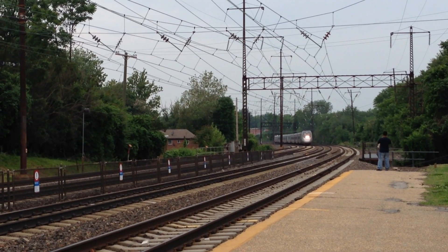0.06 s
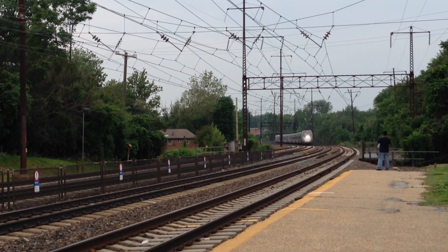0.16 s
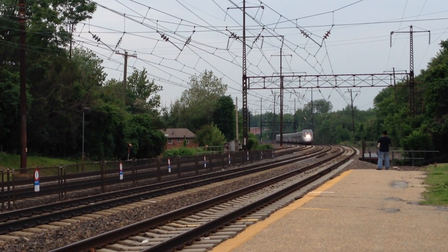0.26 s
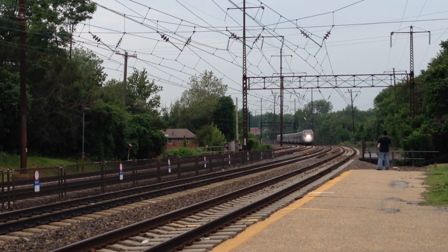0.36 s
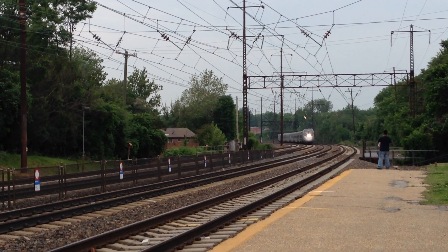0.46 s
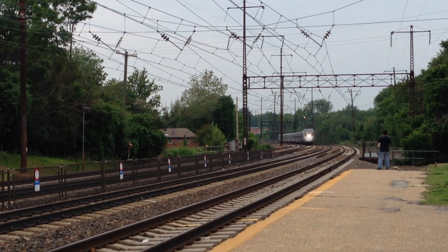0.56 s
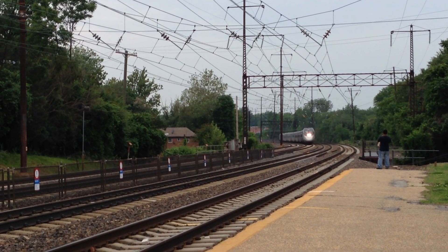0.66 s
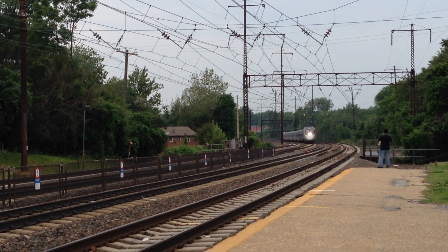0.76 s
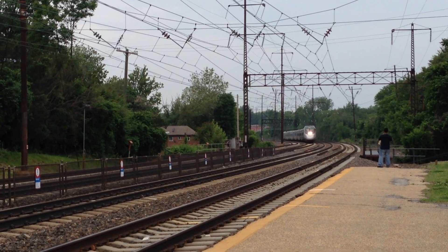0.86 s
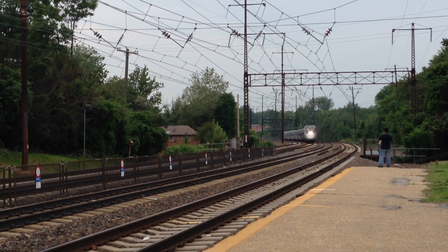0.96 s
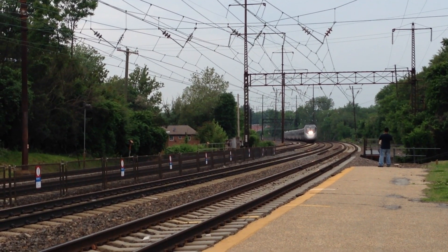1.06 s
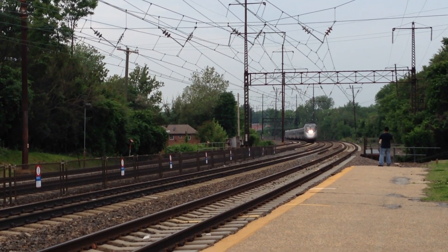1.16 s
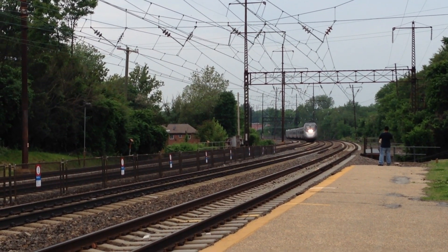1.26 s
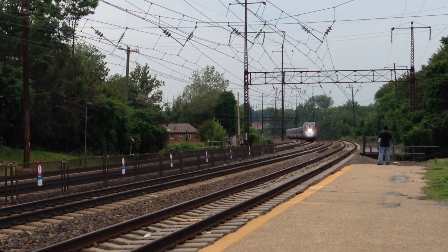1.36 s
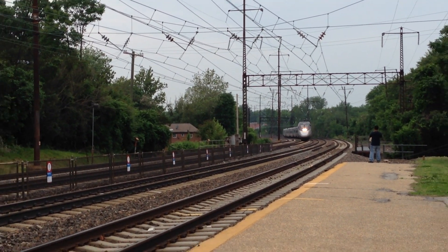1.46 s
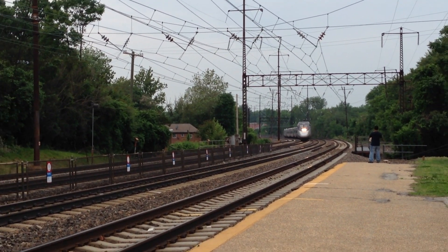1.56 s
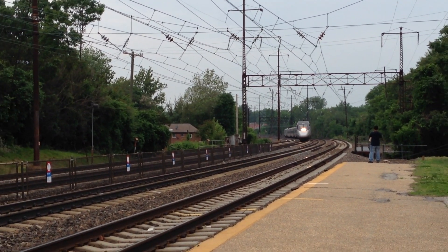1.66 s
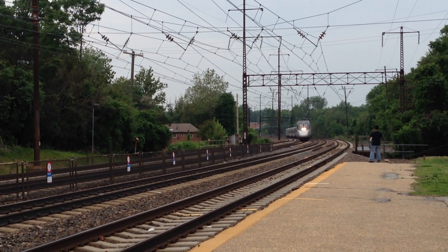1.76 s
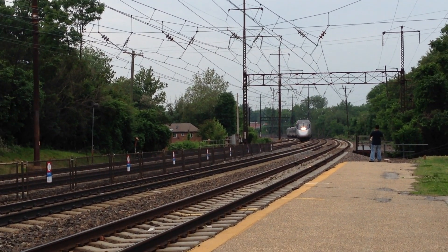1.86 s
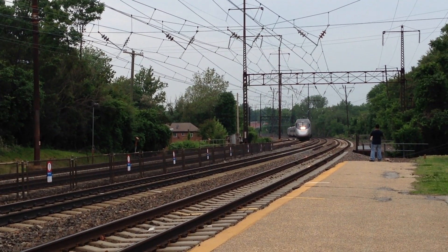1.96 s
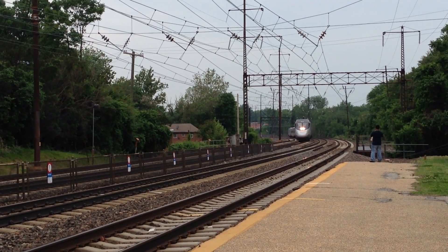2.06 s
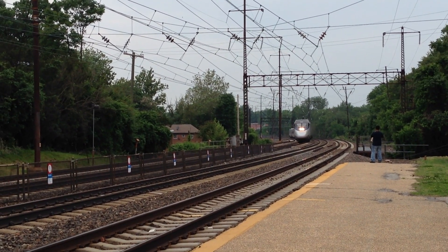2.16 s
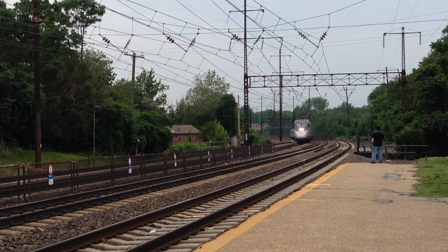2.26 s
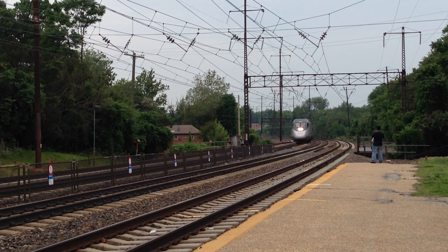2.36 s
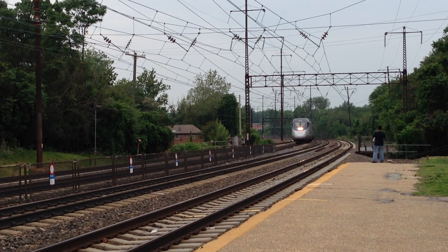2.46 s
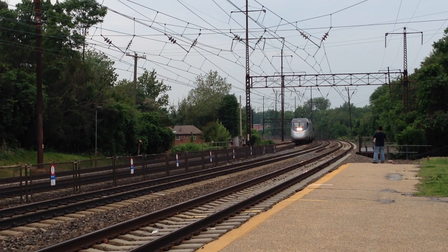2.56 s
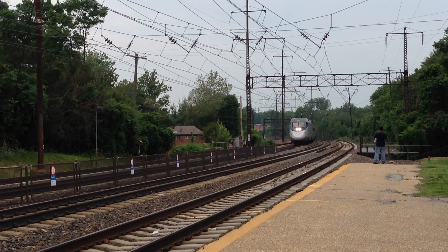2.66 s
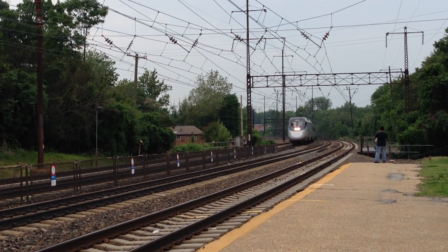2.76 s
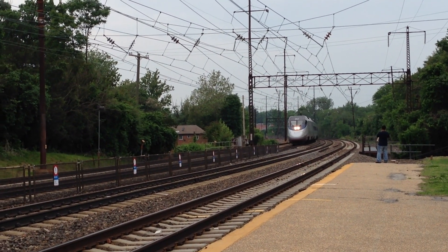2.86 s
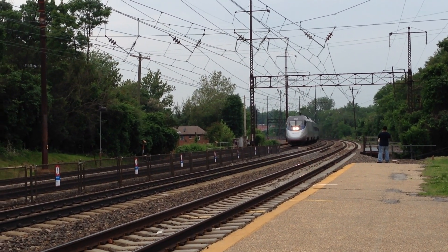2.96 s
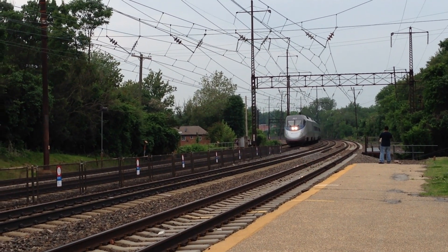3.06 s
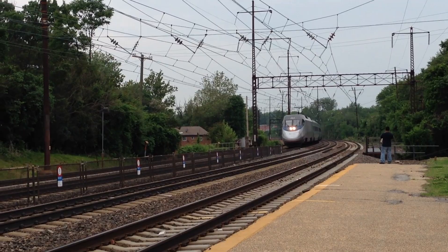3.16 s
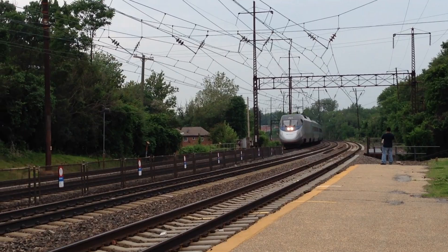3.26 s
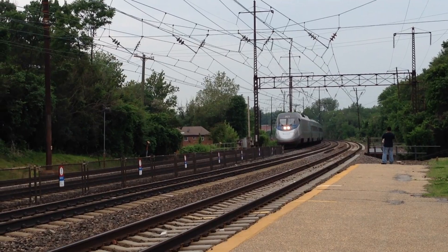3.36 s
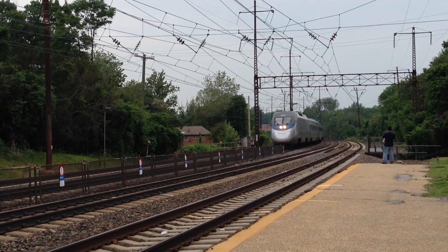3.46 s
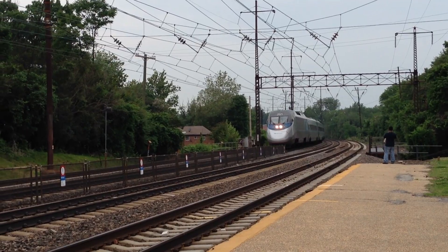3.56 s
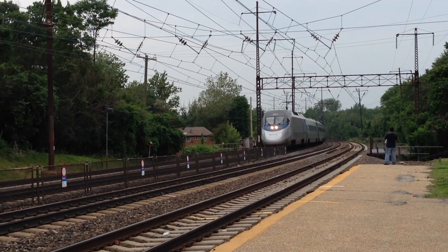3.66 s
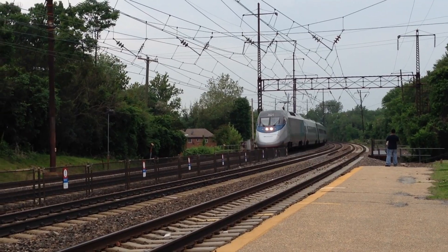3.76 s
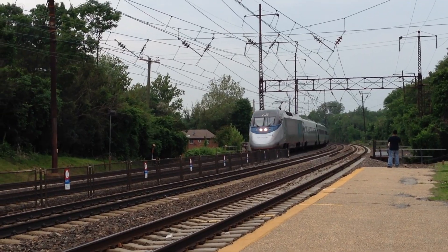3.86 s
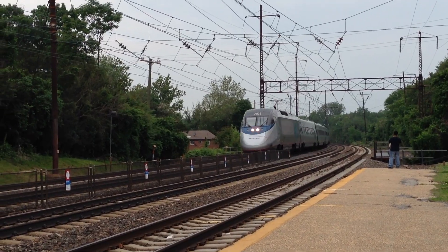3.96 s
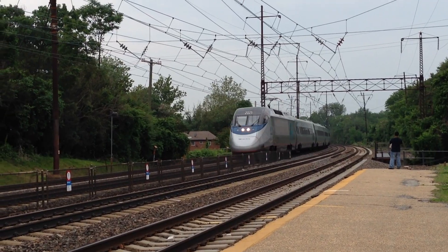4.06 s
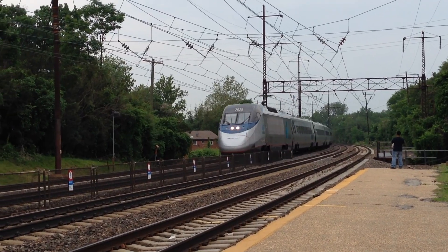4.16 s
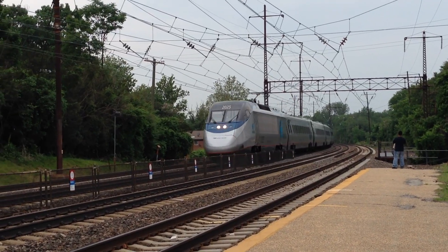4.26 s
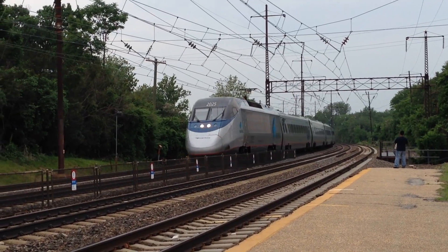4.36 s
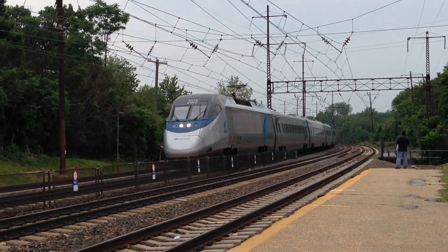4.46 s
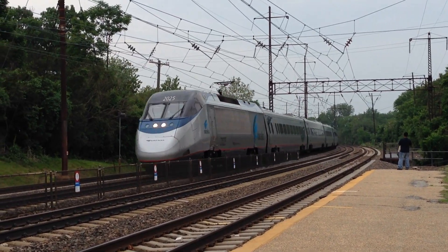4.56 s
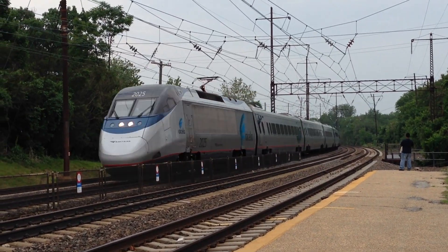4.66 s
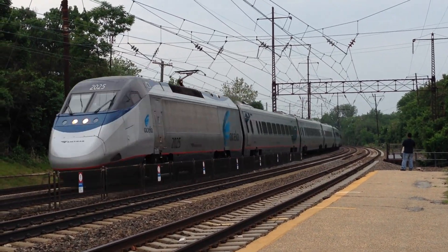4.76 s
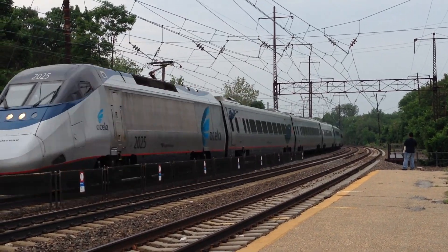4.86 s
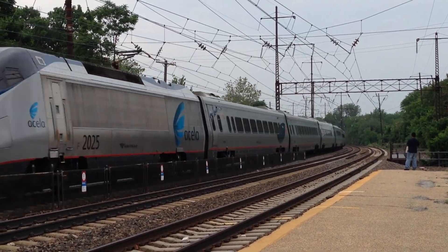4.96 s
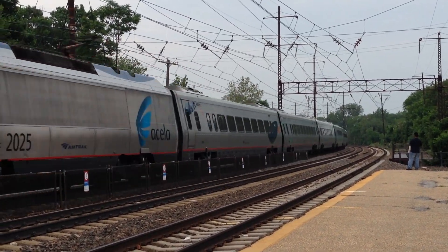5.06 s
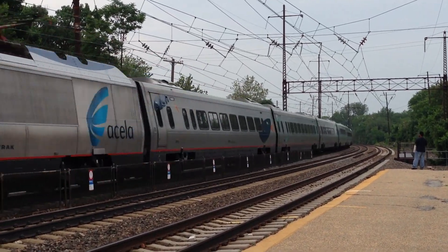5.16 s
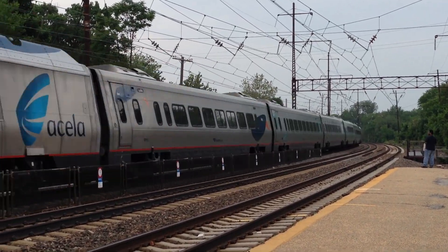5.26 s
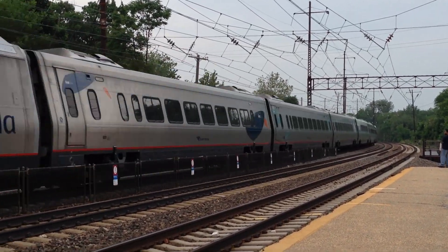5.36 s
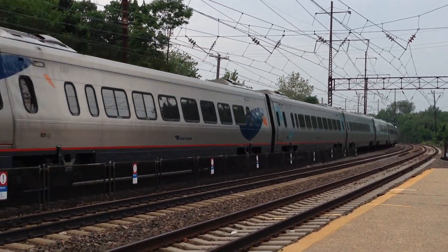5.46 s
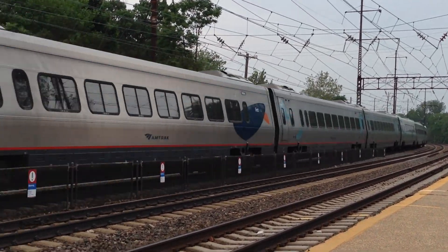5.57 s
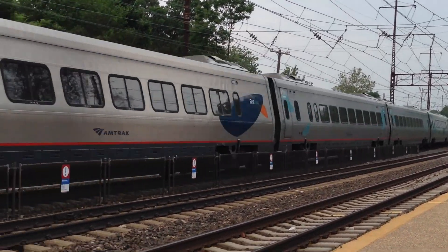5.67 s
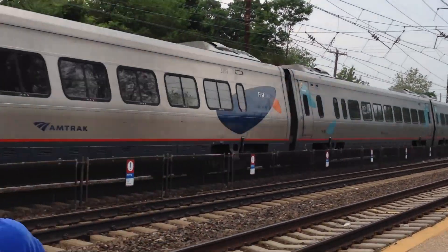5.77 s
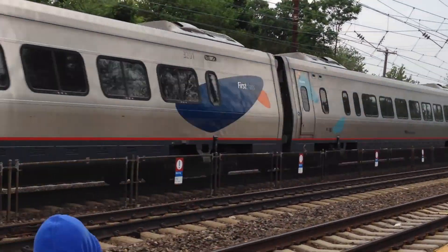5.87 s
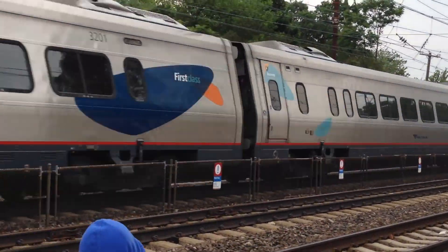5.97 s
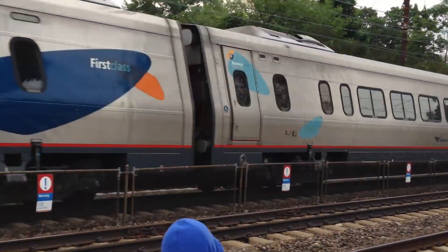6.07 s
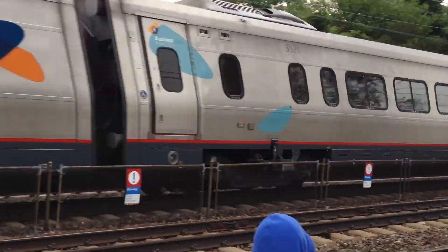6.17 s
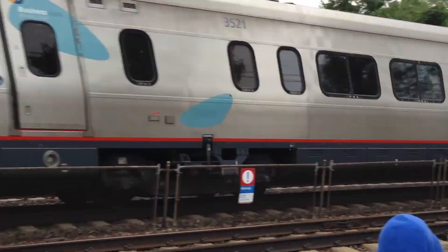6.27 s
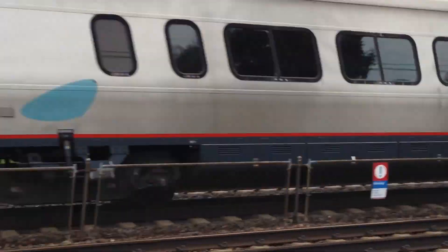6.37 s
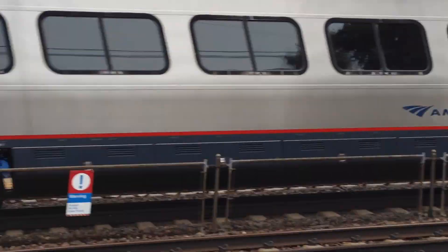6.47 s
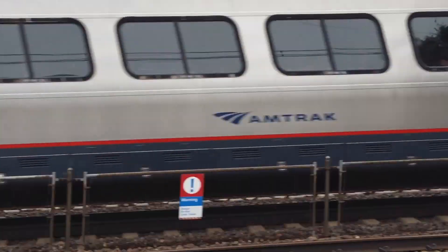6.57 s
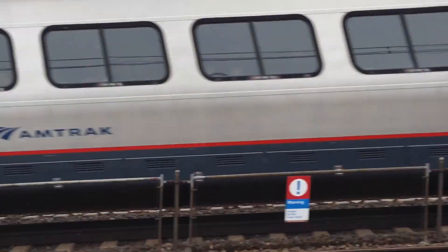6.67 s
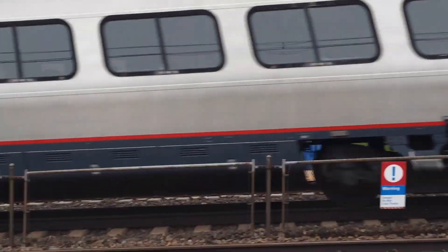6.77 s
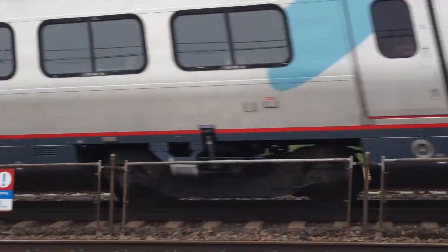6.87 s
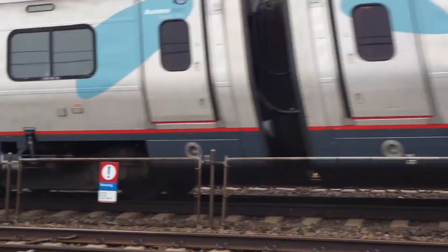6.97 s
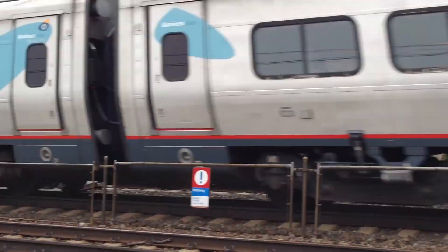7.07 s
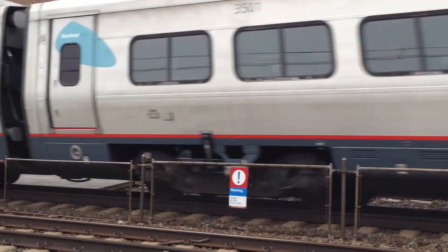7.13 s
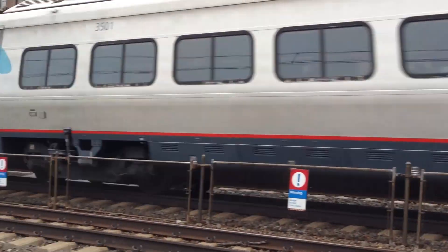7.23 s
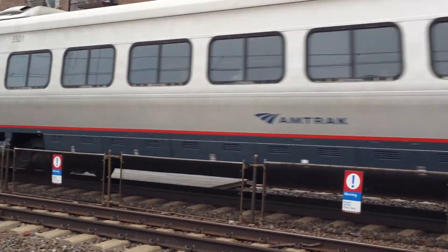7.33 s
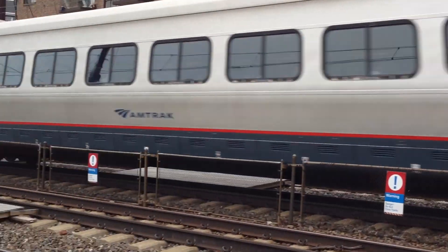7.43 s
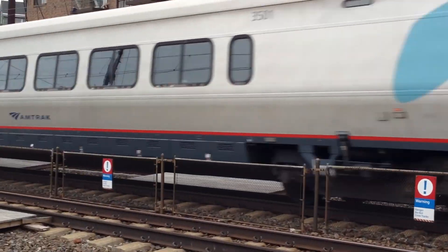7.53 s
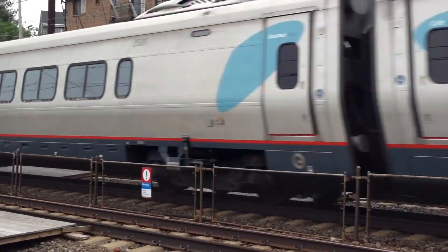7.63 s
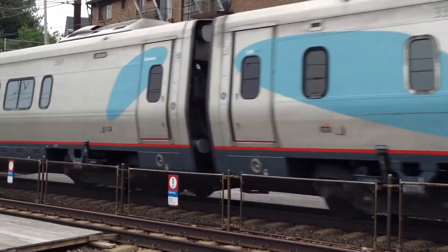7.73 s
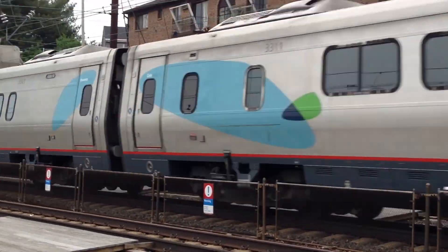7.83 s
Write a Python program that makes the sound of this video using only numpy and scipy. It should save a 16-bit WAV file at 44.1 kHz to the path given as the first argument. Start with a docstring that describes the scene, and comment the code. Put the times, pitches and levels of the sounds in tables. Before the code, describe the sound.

A quiet open-air platform, heard by one mono microphone: soft wavering low hum, faint leaves and hiss. A tiny bird gives quick whistled chirps at about 0.2, 1.1, 1.9 and 2.7 seconds. The train's distant noise slowly rises; from about 2.6 the overhead wire sizzles with a thin high ringing, with a faint crackle at 2.8. From 3 to 4.7 rolling and hissing swell unevenly, growing quickly. At 4.8 and 4.95 come two very short, bright horn blasts, a rough four-note chord with lower echoes until about 5.3. The power car then roars alongside, motors and wheels singing in bands that sink in pitch. A sharp electric crackle snaps at 5.8. From 6 to about 8 seconds coaches rush by: dense wheel roar, windy hiss and low thuddy swells near 6.5, 7 and 7.8, with whining bands around 7. It remains loud to the end.

```python
"""A country platform: an electric express draws near, gives a double blast on its horn and roars past.
The roar is five coloured noises that grow as the distance shrinks; narrow noise bands sing and sink in pitch.
The horn is four reeds built from sine overtones, with echoes and a diffuse tail of noise.
A bird calls first in gliding sine strokes; the overhead wire sizzles and sparks in noise bursts.
Distant hum and leaves lie beneath as steady noise."""
import sys
import numpy as np
from scipy import signal
from scipy.fft import rfft, irfft, next_fast_len
from scipy.io import wavfile
from scipy.ndimage import uniform_filter1d, map_coordinates

SR = 44100
rng = np.random.default_rng(int(sys.argv[2]) if len(sys.argv) > 2 else 0)


def store_wav(level_fs):
    """Save 16-bit WAV to argv[1]."""
    pcm = np.round(np.clip(np.atleast_2d(level_fs), -1, 1) * 32767)
    wavfile.write(sys.argv[1], SR, pcm.T.astype(np.int16))


N = 348390
TIME = np.arange(N) / SR  # s

# Noise colours, each [f/Hz, relative level/dB]; the noise is brought to rms 1 afterwards.
# Air pushed by the cars
BOOM_COLOUR = [(13, -49), (22, -19), (70, 1), (86, 2.5), (108, -7.5), (130, -1.5), (170, -15), (290, -120)]
# Bogies and sleepers
BODY_COLOUR = [(59, -35), (100, -11.5), (113, -6.5), (172, 3), (226, -3.5), (343, 0.5), (480, -8.5),
               (620, -59), (1060, -120)]
# Wheel on rail over open ground
ROLL_FAR_COLOUR = [(250, -30), (420, -13.5), (521, -14), (743, -6.5), (796, -2.5), (908, -0.5),
                   (1330, -3.5), (1550, -5.5), (1900, -4), (2360, -9), (2650, -25.5), (3440, -54),
                   (5830, -120)]
# Wheels and motors of the power car
ROLL_LEAD_COLOUR = [(250, -31), (420, -3.5), (627, -9), (915, -5), (1160, -3), (1260, -5), (1770, -8),
                    (1920, -11.5), (2650, -15.5), (3440, -57), (5830, -120)]
# Wheel on rail alongside
ROLL_NEAR_COLOUR = [(250, -30), (420, -4.5), (517, -4), (715, -3.5), (929, 0), (1670, -2), (1960, -0.5),
                    (2190, -3), (2380, -11), (2650, -13.5), (3440, -54), (5830, -120)]
# Slipstream over open ground
RUSH_FAR_COLOUR = [(1530, -26), (2600, -9.5), (2920, -1.5), (3700, -2), (4150, -4.5), (5140, -6),
                   (6500, -15), (8450, -31), (14300, -120)]
# Blowers of the power car
RUSH_LEAD_COLOUR = [(1440, -35), (2450, -5), (2870, -4.5), (3340, -2), (3900, -6.5), (6010, -15),
                    (6500, -17), (8450, -31), (14300, -120)]
# Slipstream alongside
RUSH_NEAR_COLOUR = [(1440, -40), (2450, -7), (2750, 0), (3020, -3.5), (6000, -8), (7800, -31),
                    (13200, -120)]
# Wire sizzling ahead of the collector
HISS_FAR_COLOUR = [(3530, -26), (6000, -3.5), (7980, -4), (8650, -2.5), (9030, -2), (11800, -6.5),
                   (13800, -8), (14600, -19), (15100, -17)]
# Slipstream fizz
HISS_NEAR_COLOUR = [(4060, -18), (6900, 0), (10200, -6), (13800, -13.5), (15100, -18)]
# Distant hum
AIR_COLOUR = [(13, -64), (22, -28), (54, -14), (108, -12.5), (246, -2), (347, -7), (498, -17), (687, -18),
              (745, -13.5), (1330, -21.5), (1510, -16.5), (1770, -11), (2700, -26), (3510, -61),
              (5940, -120)]
# Leaves and microphone hiss
LEAVES_COLOUR = [(1590, -33), (2700, -33), (2940, 3.5), (3470, -1), (3790, -0.5), (4940, -4), (5660, -7),
                 (6730, -16), (7940, -33), (10600, -20), (12400, -5), (15100, -9.5)]

# What is loudest [t/s, stage: 0 far train, 1 power car, 2 coaches]
TRAIN_STAGE = [(4.7, 0), (5.2, 1), (5.65, 1), (5.95, 2)]
# How each part of the roar nears [level alongside/dB, abreast at t/s, share of the 1/distance law,
# loss/dB per m, extra level before the coaches/dB, drift once abreast/dB per s]
BOOM_APPROACH = (-37, 5.35, .8, .105, 0.2, 0.2)
BODY_APPROACH = (-28.8, 5.3, .6, .135, 1.1, 0.2)
ROLL_APPROACH = (-22.8, 5.35, .75, .08, -0.4, 0.2)
RUSH_APPROACH = (-29, 5.55, .96, .135, 2.1, -1.8)
HISS_APPROACH = (-38.7, 6.0, .64, .105, 0.1, 0.4)
# Swells of the roar, uneven while far, then as the bogies go by
# [t/s, half width/s, boom/dB, rolling/dB, slipstream/dB, hiss/dB]
ROAR_SWELLS = [(3.27, .1, 3, 2.5, 1.5, 4), (3.56, .06, 1.5, 1.5, 0.6, 3), (3.76, .09, 0.2, 3, 1.5, 4),
               (4.15, .1, 6, 0.2, 0.2, 4.5), (4.39, .07, 1.5, 0.2, 0.2, 5), (4.55, .25, 4, 0.8, 0.2, 2.5),
               (5.55, .15, 4, 2.7, 1.6, 1.6), (5.82, .08, 3, 0.2, 0.6, 1.5),
               (6.05, .06, -2.5, 1.5, 0.6, 0.2), (6.45, .2, 3.5, 1.2, 1.5, 2.2),
               (6.95, .15, 4.5, 3, 4.5, 2.5), (7.3, .15, -4, 2.5, 1.5, 0.4), (7.55, .06, 4, 0.2, 0.2, 0.8),
               (7.8, .08, 6, 1.2, -1.5, 0.4)]
# When the wire rings [t/s, length/s, rise/s, fall/s]
WIRE_RING = (2.6, 1.1, .6, 1.7)
# Singing of wheels and motors [t/s, length/s, starting f/Hz, width/Hz, level/dB]
SINGING_BANDS = [(5.3, .38, 1190, 130, -25), (5.35, .45, 3500, 450, -36), (5.4, .3, 175, 40, -31),
                 (5.74, .25, 5050, 250, -42), (5.7, .4, 1570, 200, -25.5), (5.7, .25, 990, 140, -29),
                 (6.2, .3, 2100, 400, -30), (6.82, .48, 2120, 330, -26), (7.25, .43, 1950, 260, -26.5),
                 (7.55, .45, 2000, 260, -28), (6.8, .25, 1100, 260, -29), (6.2, .3, 2910, 200, -38),
                 (5.5, 2.4, 84, 12, -37)]

# Horn valve openings [t/s, length/s, pressure 0-1]
HORN_BLASTS = [(4.805, .095, .9), (4.95, .12, .72)]
# The four chimes [f/Hz, extra level of the fundamental/dB, own dullness/dB over the first octave]
HORN_CHIMES = [(303, -14, 0), (371, -4, -5), (449, -13, 0), (565, 0, -2)]
# When each chime speaks: one row a blast, chimes in order, each [t/s, length/s, level/dB]
CHIME_NOTES = [
    [(4.818, .045, -22.5), (4.885, .065, -24), (4.84, .08, -22.5), (4.852, .05, -21.5)],
    [(4.97, .05, -30), (4.978, .09, -24.5), (4.978, .05, -22.5), (4.975, .09, -26.5)],
]
# Tone colour given by the horn mouth [f/Hz, level/dB]
HORN_MOUTH = [(300, 1), (900, 0.5), (1200, -2), (1450, -7), (1800, 0.5), (2250, -3.5), (2700, -12.5),
              (4000, -10), (7000, -16.5), (15000, -32)]
# Strong partials coming back lower and duller [t/s, length/s, f at the start/Hz, level/dB]
HORN_ECHOES = [(4.91, .035, 508, -25), (4.96, .05, 497, -21), (5.02, .18, 535, -24), (5.2, .06, 498, -28),
               (5.04, .1, 708, -23), (5.205, .09, 359, -26)]
# Crackles on the wire [t/s, level/dB, time to fall 60 dB/s]
WIRE_SPARKS = [(2.834, -57, .015), (5.805, -31, .09)]
# Bird calls [t/s, level/dB, pitch factor]
BIRD_CALLS = [(.174, -61, .99), (1.09, -57, 1.02), (1.93, -54, .99), (2.682, -56, 1.04)]
# Strokes of one call [t into the call/s, length/s, starting f/Hz, ending f/Hz, level/dB]
BIRD_STROKES = [(.004, .012, 5300, 5750, -11), (.021, .013, 3700, 5350, -1), (.038, .02, 4950, 4500, -2.5),
                (.058, .009, 4450, 3450, -3), (.067, .013, 3350, 3450, -2.5), (.086, .022, 3250, 3400, -3)]

SPEED_M_PER_S, TRACK_M = 35, 8  # train speed; microphone to track
BODY_SHARE = .3  # the body swells with the boom, by this share of its dB
WIRE_HZ, WIRE_WIDTH_HZ, WIRE_DB = 8860, 350, -8  # the wire rings inside its sizzle; dB next to the sizzle
SINK = .075  # share of its pitch that a singing band loses
REED_ATTACK_S, REED_RELEASE_S, REED_WAVER_DB = .012, .03, 2.5
PRESSURE_RISE_S, PRESSURE_FALL_S = .065, .06
DULL_DB = -8  # brightness in dB an octave at no pressure
HORN_SAG_PER_S = .06  # share of pitch lost a second as the nose draws level
ECHO_ATTACK_S, ECHO_RELEASE_S, ECHO_SAG_PER_S = .025, .05, .12
STROKE_EDGE_S = .003
AIR_DB, AIR_WAVER_DB, LEAVES_DB = -50.5, 1.2, -63.5
TOP_HZ = 15250  # nothing is heard above this
CEILING = .56  # peaks are rounded off towards this


def roar():
    """The whole train: five noise sources added up, with a slight shared unsteadiness."""
    boom_up, roll_up, rush_up, hiss_up = swells()
    low = boom(boom_up) + bodies(boom_up)
    high = rolling(roll_up) + slipstream(rush_up) + sizzle(hiss_up)
    return (low + high) * amp(0.6 * wobble(9))


def rolling(swell_db):
    """Wheels roughly rolling on rails; the noise changes colour as the train arrives."""
    colours = [ROLL_FAR_COLOUR, ROLL_LEAD_COLOUR, ROLL_NEAR_COLOUR]
    return amp(passing(*ROLL_APPROACH) + swell_db) * blend(colours, patchy_db=1.4)


def slipstream(swell_db):
    """Turbulent air along the cars, with the blowers of the power car between far and near."""
    level_db = passing(*RUSH_APPROACH) + swell_db + 0.8 * wobble(11)
    return amp(level_db) * blend([RUSH_FAR_COLOUR, RUSH_LEAD_COLOUR, RUSH_NEAR_COLOUR], patchy_db=1.4)


def bodies(boom_swell_db):
    """Bogies and sleepers shaken by the train: low noise."""
    level_db = passing(*BODY_APPROACH) + BODY_SHARE * boom_swell_db + 0.8 * wobble(9)
    return amp(level_db) * rush(BODY_COLOUR, patchy_db=1.05)


def boom(swell_db):
    """Air pushed by the cars: very low noise."""
    level_db = passing(*BOOM_APPROACH) + swell_db + 1.5 * wobble(7)
    return amp(level_db) * rush(BOOM_COLOUR, patchy_db=0.5)


def sizzle(swell_db):
    """The wire sizzles and rings ahead of the collector, then the slipstream fizzes."""
    hiss = blend([HISS_FAR_COLOUR, HISS_NEAR_COLOUR, HISS_NEAR_COLOUR], patchy_db=0.9)
    ring_level = amp(WIRE_DB + .3 * swell_db + 2.5 * wobble(14)) * gate(*WIRE_RING)
    ring = ring_level * narrow(np.full(N, WIRE_HZ), WIRE_WIDTH_HZ)
    return amp(passing(*HISS_APPROACH) + swell_db + 0.8 * wobble(8.9)) * (hiss + ring)


def singing():
    """Narrow noise bands swell, flicker, sink in pitch and fade as their axle or motor passes."""
    out = np.zeros(N)
    for start, length, hz, width_hz, db in SINGING_BANDS:
        progress = np.clip((TIME - start) / length, 0, 1)
        swell = np.sqrt(np.sin(np.pi * progress).clip(0))
        level = amp(db + 3.5 * wobble(14)) * swell
        out += level * narrow(hz * (1 - SINK * progress), width_hz)
    return out


def horn():
    """Four reed chimes rich in overtones; more pressure makes them brighter."""
    pressure = sum(top * gate(s, length, PRESSURE_RISE_S, PRESSURE_FALL_S) for s, length, top in HORN_BLASTS)
    tilt_db = DULL_DB * (1 - pressure.clip(0, 1))
    pitch = 1 - HORN_SAG_PER_S * (TIME - HORN_BLASTS[1][0])
    # only this stretch is computed, to save work
    span = slice(round(HORN_BLASTS[0][0] * SR) - SR // 20, round(HORN_BLASTS[-1][0] * SR) + SR // 4)
    out = np.zeros(N)
    for (hz, first_db, dull_db), notes in zip(HORN_CHIMES, zip(*CHIME_NOTES)):
        level = sum(amp(db) * gate(s, length, REED_ATTACK_S, REED_RELEASE_S) for s, length, db in notes)
        level = level * amp(REED_WAVER_DB * wobble(35))
        # uneven cycles smear the high overtones
        jitter = .004 * wobble(50) + .015 * wobble(350)
        phase = tone(hz * pitch * (1 + jitter))[span]
        k = np.arange(1, int(TOP_HZ / hz))[:, None]  # overtone numbers
        octaves = np.log2(np.maximum(k * hz / 950, 1))  # above 950 Hz
        gain_db = along(HORN_MOUTH, k * hz) + first_db * (k == 1)
        gain_db = gain_db + tilt_db[span] * octaves + dull_db * octaves.clip(0, 1)
        overtones = np.sin(k * phase + rng.uniform(0, 2 * np.pi, k.shape))
        reed = np.sum(amp(gain_db) * overtones, axis=0)
        roughness = 1 + .18 * wobble(400)[span]  # turbulent air roughens the reed
        out[span] += reed * level[span] * roughness
    return out


def echoes():
    """Walls off to the side hear the moving horn at a lower pitch and return it late."""
    out = np.zeros(N)
    for start, length, hz, db in HORN_ECHOES:
        phase = tone(hz * (1 - ECHO_SAG_PER_S * (TIME - start) + .004 * wobble(40)))
        level = amp(db + 2.5 * wobble(30)) * gate(start, length, ECHO_ATTACK_S, ECHO_RELEASE_S) ** 2
        out += level * (np.sin(phase) + amp(-12) * np.sin(2 * phase))
    return out


def sparks():
    """Crackles on the wire: bright noise that starts at once and dies away."""
    level = sum(amp(db - 60 * (TIME - s).clip(0) / t60) * (TIME >= s) for s, db, t60 in WIRE_SPARKS)
    return level * rush([(2500, -40), (4000, 1), (10000, 0), (15000, -10)], patchy_db=2.5)


def bird():
    """One call of gliding whistled strokes, repeated, with a quavering pitch and a fluttering level."""
    out = np.zeros(N)
    quaver = 1 + .035 * wobble(220)
    for start, call_db, factor in BIRD_CALLS:
        for s, length, start_hz, end_hz, stroke_db in BIRD_STROKES:
            glide_hz = np.interp(TIME - start, [s, s + length], [start_hz, end_hz])
            level = amp(call_db + stroke_db) * gate(start + s, length, STROKE_EDGE_S, STROKE_EDGE_S)
            out += level * np.sin(tone(factor * quaver * glide_hz))
    out *= amp(4.5 * wobble(200))
    return scatter(out, t60=.22, wet_db=-1.5)


def background():
    """A wavering distant hum, plus leaves and microphone hiss: two coloured noises."""
    hum = amp(AIR_DB + AIR_WAVER_DB * wobble(8)) * rush(AIR_COLOUR, patchy_db=1.0)
    return hum + amp(LEAVES_DB) * rush(LEAVES_COLOUR, patchy_db=1.4)


def scatter(x, t60, wet_db):
    """Trees and fences return a diffuse tail: noise that falls 60 dB in t60 seconds."""
    t = TIME[:SR // 2]
    tail = rng.standard_normal(len(t)) * amp(-60 * t / t60)
    return x + amp(wet_db) * signal.fftconvolve(x, tail / np.linalg.norm(tail))[:N]


def passing(db, abreast_s, spread, loss_db, lead_db, drift_db):
    """Level in dB of a source that nears along the track, then stays alongside."""
    metres = np.hypot(SPEED_M_PER_S * (abreast_s - TIME).clip(0), TRACK_M)
    distance_db = -spread * 20 * np.log10(metres / TRACK_M) - loss_db * (metres - TRACK_M)
    lead = (2 - train_stage()).clip(0, 1)  # 1 until the power car, 0 at the coaches
    return db + distance_db + lead_db * lead + drift_db * (TIME - abreast_s).clip(0)


def swells():
    """Bell-shaped rises and dips in dB for boom, rolling, slipstream and hiss."""
    return sum(np.outer(db, np.exp(-((TIME - s) / half) ** 2)) for s, half, *db in ROAR_SWELLS)


def train_stage():
    """What is loudest, sliding from far train (0) to power car (1) to coaches (2)."""
    s, stage = np.transpose(TRAIN_STAGE)
    return np.interp(TIME, s, stage)


def blend(colours, patchy_db):
    """Crossfades noises of three colours, one for each stage of the train, at even power."""
    stage = train_stage()
    out = np.zeros(N)
    for number, colour in enumerate(colours):
        share = np.sqrt((1 - abs(stage - number)).clip(0))
        out += share * rush(colour, patchy_db)
    return out


def rush(spectrum, patchy_db):
    """Coloured noise of rms 1 with patches of random gain over time and pitch."""
    z = signal.stft(rng.standard_normal(N + 512), nperseg=512)[2]
    field = uniform_filter1d(rng.standard_normal(z.shape), size=5, axis=0)
    field = uniform_filter1d(field, size=12, axis=1)
    patches = signal.istft(z * amp(patchy_db * unit(field)), nperseg=512)[1][:N]
    return unit(filtered(patches, lambda hz: amp(along(spectrum, hz))))


def narrow(hz, width_hz):
    """A narrow band of noise around a pitch curve."""
    phase = tone(hz)
    return wobble(width_hz) * np.sin(phase) + wobble(width_hz) * np.cos(phase)


def tone(hz):
    """Running phase of a pitch curve, in radians."""
    return 2 * np.pi * np.cumsum(hz) / SR


def wobble(rate):
    """A smooth random curve through rate random points a second."""
    points = rng.standard_normal(int(N * rate / SR) + 4)
    return map_coordinates(points, [TIME * rate])


def gate(start, length, attack, release):
    """Rises from start, holds, and falls after start + length: 0 to 1."""
    return np.minimum((TIME - start) / attack, 1 + (start + length - TIME) / release).clip(0, 1)


def filtered(x, response):
    """Multiplies the spectrum of x by a response of frequency."""
    m = next_fast_len(N + 8192)
    return irfft(rfft(x, m) * response(np.fft.rfftfreq(m, 1 / SR)), m)[:N]


def along(points, hz):
    """Reads values between (Hz, value) points on a log frequency axis."""
    f, v = np.transpose(points)
    return np.interp(np.log(hz + 1), np.log(f + 1), v)


def amp(db):
    """Turns dB into a gain."""
    return 10 ** (np.asarray(db) / 20)


def unit(x):
    """Scales x to rms 1."""
    return x / np.sqrt(np.mean(x ** 2) + 1e-20)


def scene():
    """All sources as they reach the platform."""
    train = roar() + singing()
    horn_in_the_open = scatter(horn() + echoes(), t60=0.62, wet_db=-5)
    mono = train + horn_in_the_open + sparks() + bird() + background()
    return np.array([mono, mono])


def record(dry):
    """One microphone feeds both channels, rounds off the loudest peaks and cuts all above its band limit."""
    rounded = dry[0] / (1 + abs(dry[0] / CEILING) ** 7) ** (1 / 7)
    mono = filtered(rounded, lambda hz: hz < TOP_HZ)
    return np.array([mono, mono])


dry = scene()
out = record(dry)
store_wav(out)
```